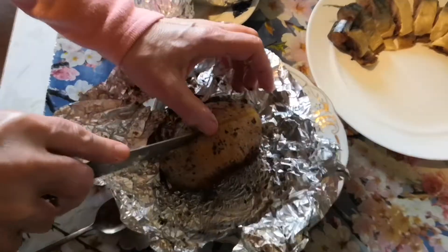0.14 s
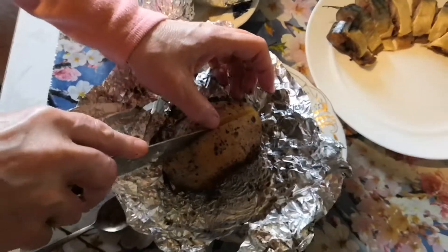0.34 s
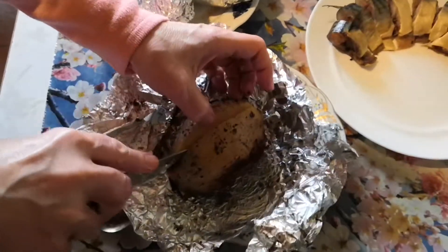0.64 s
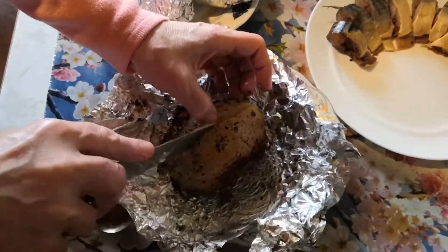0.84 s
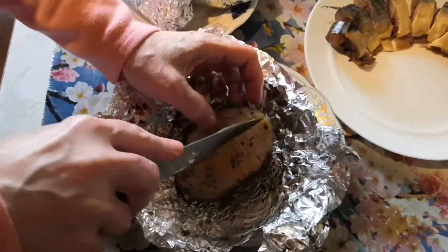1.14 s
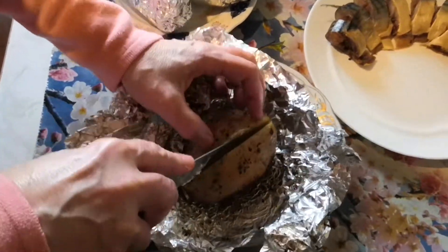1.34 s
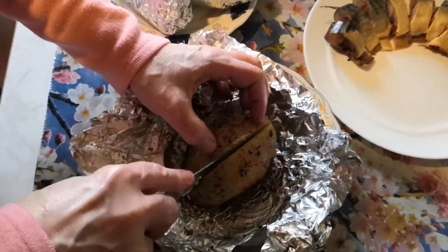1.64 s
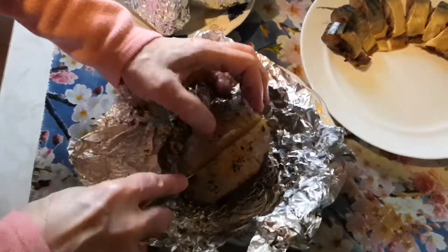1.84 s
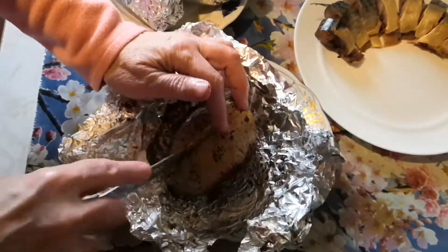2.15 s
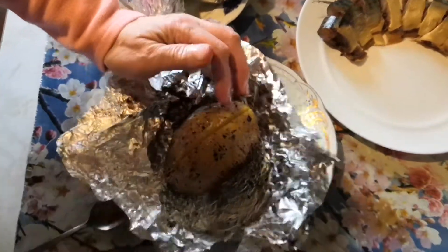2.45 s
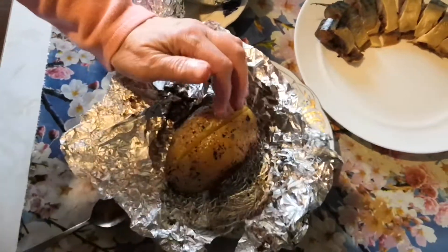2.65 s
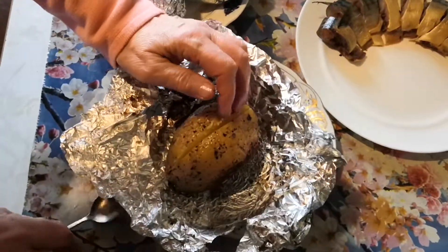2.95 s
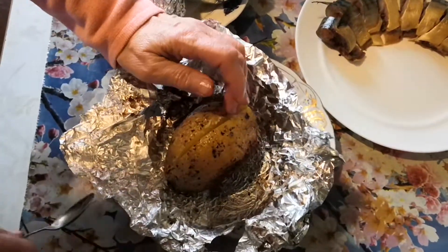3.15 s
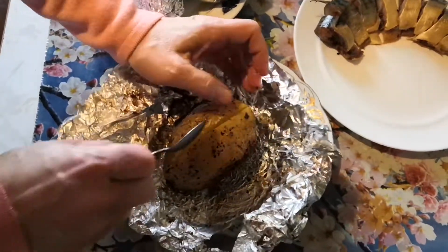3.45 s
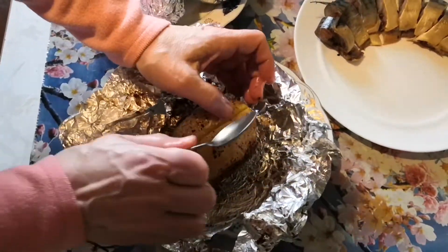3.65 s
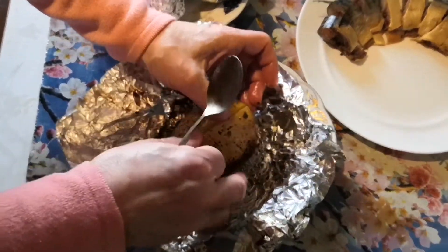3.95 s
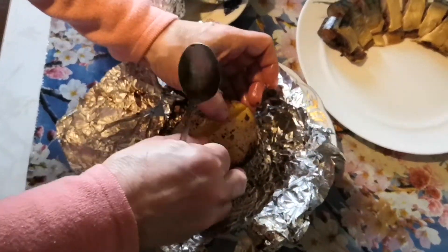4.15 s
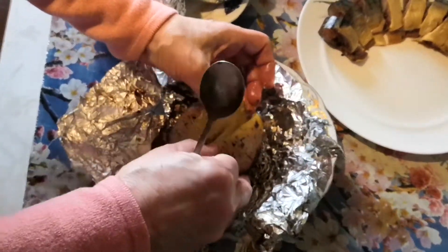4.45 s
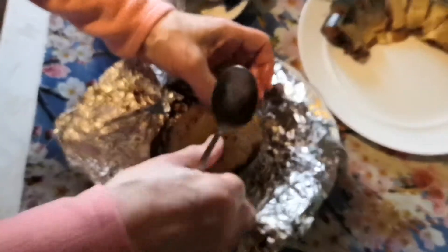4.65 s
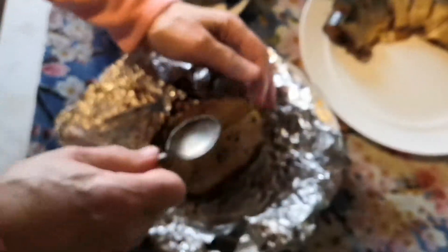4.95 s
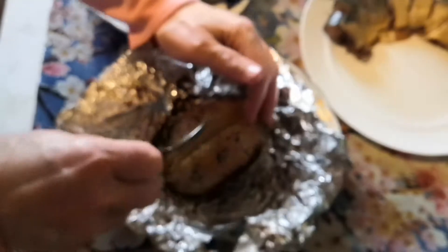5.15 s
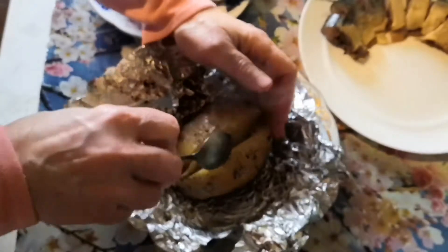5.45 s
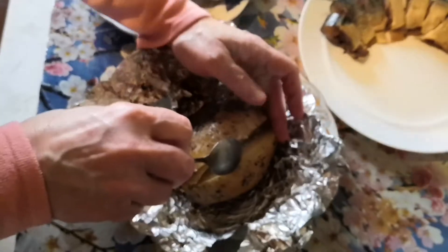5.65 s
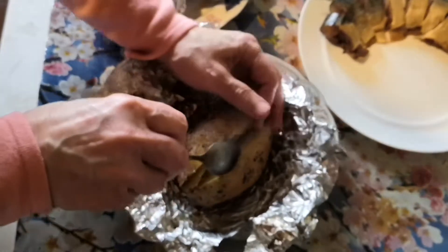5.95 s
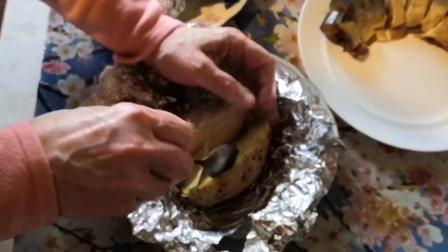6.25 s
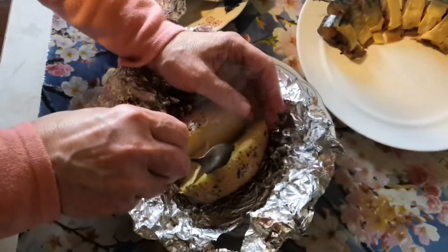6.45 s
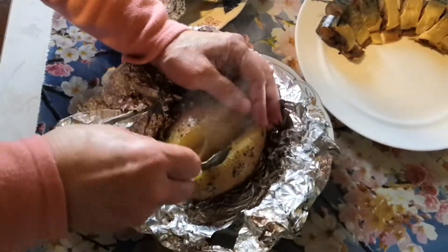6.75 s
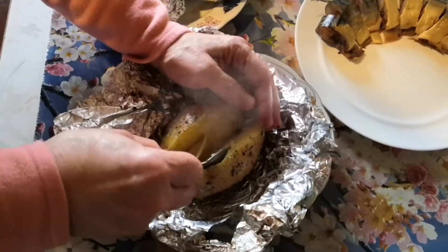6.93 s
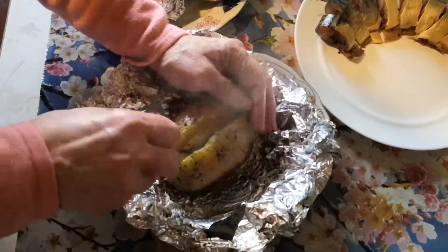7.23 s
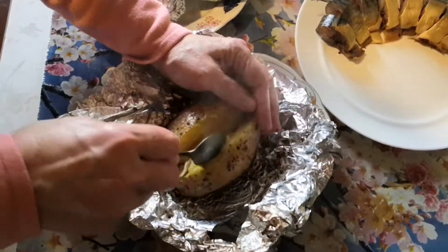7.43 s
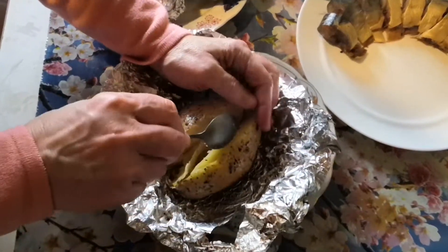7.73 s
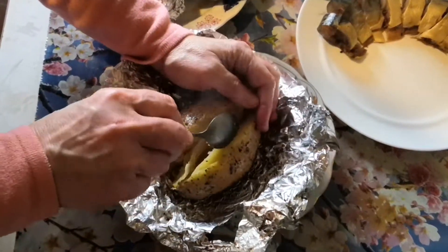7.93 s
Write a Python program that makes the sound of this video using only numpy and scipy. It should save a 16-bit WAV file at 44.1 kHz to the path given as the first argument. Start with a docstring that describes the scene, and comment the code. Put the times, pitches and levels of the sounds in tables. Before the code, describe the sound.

Crumpled aluminium foil rustles and snaps in short, irregular bursts as hands cut a baked potato. About a third of the way in, a knife clatters loudly down, making the table top thud and ring. A spoon scrapes briefly over the cloth and taps as it lifts. The crackling resumes with faint rubbing as the potato is prised open. It sounds close and slightly left, in a quiet kitchen with an appliance humming.

```python
"""A kitchen table in a quiet room, an appliance humming; two microphone ports, the action to their left.
Hands cut and prise open a baked potato in crumpled aluminium foil, which rustles as tiny creases
give way and snaps as larger ones buckle. Steel and fingers slide over it. A knife clatters down and
sets the table top ringing; a spoon is dragged over the cloth and knocks lightly as it lifts."""
import sys
import numpy as np
from scipy import signal
from scipy.fft import rfft, irfft, next_fast_len
from scipy.io import wavfile
from scipy.ndimage import uniform_filter1d, map_coordinates

SR = 44100
rng = np.random.default_rng(int(sys.argv[2]) if len(sys.argv) > 2 else 0)


def master(y):
    """Save y as 16-bit WAV."""
    cut = np.clip(np.atleast_2d(y).T, -1, 1)
    pcm = np.round(cut * 32767)  # scale
    wavfile.write(sys.argv[1], SR, pcm.astype(np.int16))


N = 356769


def amp(db):
    """Decibels to gain."""
    return 10 ** (np.asarray(db) / 20)


def unit(x):
    """Scaled to an rms of 1."""
    return x / np.sqrt(np.mean(x ** 2) + 1e-20)


def even(x):
    """Level held steady over 60 ms, so that only the hands set the swells."""
    return x / np.sqrt(np.abs(uniform_filter1d(np.mean(x ** 2, 0), size=2600)) + 1e-20)


def along(points, hz):
    """Reads between (Hz, value) points on a log axis."""
    points_hz, values = np.transpose(points)
    return np.interp(np.log(hz + 1), np.log(points_hz + 1), values)


def wobble(rate):
    """A smooth random curve, rate knots a second."""
    return map_coordinates(rng.standard_normal(int(N * rate / SR) + 4), [np.arange(N) * rate / SR])


def mode(f, centre_hz, width_hz):
    """One resonance, gain 1 at its centre."""
    return 1j * f * width_hz / (centre_hz ** 2 - f ** 2 + 1j * f * width_hz + 1e-9)


def ringing(modes, t, scatter_db):
    """The decaying sines of a struck object, each a little louder or softer with every strike."""
    return sum(amp(db + rng.normal(0, scatter_db) - 60 * t / t60_s) * np.sin(2 * np.pi * hz * t)
               for hz, db, t60_s in modes)


def filtered(x, response):
    """x through a complex response of frequency."""
    size = next_fast_len(N + SR // 2)
    return irfft(rfft(x, size) * response(np.fft.rfftfreq(size, 1 / SR)), size)[..., :N]


def dull(x, top_hz):
    """A gentle loss of treble."""
    return signal.sosfilt(signal.butter(2, top_hz, fs=SR, output="sos"), x)


def pan(db):
    """Left and right gains for a level difference."""
    return amp(np.array([db / 2, -db / 2]))


def ports(x, lead_s, shade=1):
    """The left port hears the source first; the camera body shades the treble on the right."""
    # the body's shadow: frequency_hz, left_over_right_db
    shadow = [(300, 10.5), (1300, -8.5), (2400, 3), (4400, 3), (8100, 7), (15000, 5)]
    side = np.array([[1], [-1]]) / 2
    return filtered(x, lambda hz: amp(shade * side * along(shadow, hz))
                    * np.exp(2j * np.pi * hz * lead_s * side))


def room_tone():
    """An appliance's wavering motor hum over soft room noise, near mono in the bass."""
    # motor partials: pitch_hz, level_db
    partials = [(49.3, -60), (98.5, -73), (149, -62.5), (196, -59), (238, -70.5), (295, -69.5)]
    # room noise spectrum: frequency_hz, gain_db
    air = [(15, -47.5), (25, -0.5), (59, 1.5), (97, -1.5), (195, 4), (242, -0.5), (450, -5), (659, -18),
           (1370, -10), (1700, -5.5), (2110, -13), (4140, -19.5), (7710, -25.5), (14400, -38.5),
           (16000, -61)]
    # likeness of that noise at the two ports: frequency_hz, correlation
    likeness = [(60, 0.96), (130, 1), (290, 0.53), (640, 0.039), (1400, 0.046)]

    def mid_and_side(hz):
        angle = np.arccos(np.clip(along(likeness, hz), -1, 1)) / 2
        return amp(along(air, hz)) * [np.cos(angle), np.sin(angle)]

    t = np.arange(N) / SR
    hum = sum(amp(db - 3 + 0.9 * wobble(7.8)) * np.sin(2 * np.pi * hz * t + 0.41 * wobble(15))
              for hz, db in partials)
    mid, side = filtered(rng.standard_normal((2, N)), mid_and_side)
    return hum + amp(-62.5) * unit(np.array([mid + side, mid - side]))


def kitchen(x):
    """The room answers about 6 ms late, each frequency dying at its own speed."""
    # reverberation: frequency_hz, t60_s
    decay = [(200, 0.42), (2000, 0.14), (10000, 0.17)]
    hz, t, spectrum = signal.stft(rng.standard_normal((2, SR // 2)), SR, nperseg=256)
    tail = signal.istft(spectrum * amp(-60 * t / along(decay, hz)[:, None]), SR, nperseg=256)[1]
    return signal.fftconvolve(np.pad(x, (250, 0))[None], tail / np.linalg.norm(tail[0]), axes=1)[:, :N]


def friction(strokes, unshared):
    """Grainy rubbing noise, one resonance a stroke; unshared is the gain of each port's own noise."""
    out, size, edge_s = np.zeros((2, N + SR)), 16384, 0.0041
    t, f = np.arange(size) / SR, np.fft.rfftfreq(size, 1 / SR)
    for start_s, length_s, db, hz, width_hz in strokes:
        hiss = rng.standard_normal((3, size))
        rub = unit(irfft(rfft(hiss[0] + unshared * hiss[1:]) * mode(f, hz, width_hz) ** 2))
        touching = np.clip(np.minimum(t, length_s - t) / edge_s, 0, 1)
        out[:, round(start_s * SR):][:, :size] += amp(db) * rub * touching
    return out[:, :N] * amp(1.4 * wobble(130))


def table_top():
    """The table top rings and rattles under each blow; the soft low thud reaches both ports alike."""
    # blows that reach the wood: start_s, level_db, thud_gain_db, thud_hz, thud_t60_s
    blows = [(1.717, -48.5, 4.5, 69.5, 0.2), (1.758, -51, 12, 77.5, 0.15), (1.79, -47.5, 6.5, 76, 0.2),
             (2.534, -41, 2.5, 124, 0.11), (2.554, -45, 10, 77.5, 0.13), (2.576, -31, -8.5, 106.6, 0.14),
             (2.601, -51, 6, 41.5, .2), (2.705, -21.5, -31.5, 105.6, .15), (2.717, -19.5, -21, 76, .15),
             (2.73, -34.5, -4, 131.3, 0.49), (2.874, -40.5, 1, 108, 0.12), (4.36, -52, 14, 114, 0.16)]
    # modes of the top: pitch_hz, gain_db, t60_s
    modes = [(124.6, -5, 0.51), (135.1, -5.5, 0.68), (265, -1.5, 0.2), (345, -2, 0.13), (399.5, -1.5, 0.19),
             (832, 10, 0.037)]
    # it shudders as the potato is pushed about: start_s, length_s, level_db, pitch_hz, width_hz
    shudders = [(6.04, 0.17, -59, 150, 60), (7.28, 0.185, -61.5, 144, 60.3)]
    knocks, thuds, t = np.zeros((2, N + SR)), np.zeros(N + SR), np.arange(SR // 2) / SR
    wood = signal.butter(2, [180, 950], "bandpass", fs=SR, output="sos")
    for start_s, db, thud_db, thud_hz, thud_t60_s in blows:
        ring = amp(-15.5) * ringing(modes, t, scatter_db=2.1)
        rattle = amp(-60 * t / 0.34) * signal.sosfilt(wood, rng.standard_normal((2, len(t))))
        thud_level = amp(db + thud_db + 1 - 60 * t / thud_t60_s) * (1 - np.exp(-t / 0.0062))
        knocks[:, round(start_s * SR):][:, :len(t)] += amp(db) * (ring + rattle)
        thuds[round(start_s * SR):][:len(t)] += thud_level * np.sin(2 * np.pi * thud_hz * t)
    return ports(knocks[:, :N], lead_s=0.00026, shade=0) + thuds[:N] + friction(shudders, unshared=0.14)


def spoon_drag():
    """Stick-slip on the cloth excites the spoon's resonances, hardest where it catches."""
    # resonances of the spoon: pitch_hz, width_hz, gain_db
    modes = [(1770, 190, -2), (2775, 480, 10.5), (4050, 1900, -7.5)]
    # catches on the weave: crest_s, level_db
    catches = [(2.968, -51), (2.981, -36.5), (2.99, -34.5), (3, -36), (3.008, -35.5), (3.04, -37.5),
               (3.053, -46)]

    def metal(f):
        peaks = sum((-1) ** k * amp(db) * mode(f, hz, width_hz) ** 2
                    for k, (hz, width_hz, db) in enumerate(modes))
        return peaks + amp(-7) * mode(f, 2600, 4000) ** 2

    start_s, end_s, edge_s, catch_s = 2.958, 3.072, 0.011, 0.0026
    t = np.arange(N) / SR
    slips = rng.standard_normal(N) * amp(1.1 * wobble(150))
    moving = np.clip(np.minimum(t - start_s, end_s - t) / edge_s, 0, 1) ** 2
    progress = np.clip((t - start_s) / (end_s - start_s), 0, 1)
    drag = amp(-38 - 1.5 * progress) * moving  # easing off
    jerks = sum(amp(db) * np.exp(-np.minimum(((t - s) / catch_s) ** 2, 50)) for s, db in catches)
    return dull(unit(filtered(slips, metal)), top_hz=7100) * (drag + jerks)


def spoon_taps():
    """The handle knocks lightly as the spoon lifts: a short ring with a faint tick."""
    # knocks: start_s, level_db
    knocks = [(3.142, -43), (3.160, -47.5), (3.173, -40)]
    # modes of the handle: pitch_hz, gain_db, t60_s
    handle = [(1715, 5.5, 0.025), (2360, 7.5, 0.025)]
    out, t = np.zeros(N + SR), np.arange(SR // 10) / SR
    attack = 1 - np.exp(-t / 0.003)
    for start_s, db in knocks:
        ring = ringing(handle, t, scatter_db=1.9)
        tick = amp(-5 - 60 * t / 0.026) * rng.standard_normal(len(t))
        out[round(start_s * SR):][:len(t)] += amp(db) * attack * (ring + tick)
    return out[:N]


def burst(response, rise_s, kick, size=2048):
    """One sharp kick inside a dying puff of noise, through a response; the ports share half the noise."""
    age = np.arange(size) / SR / rise_s
    hiss = rng.standard_normal((3, size))
    drive = (hiss[0] + hiss[1:]) * np.sqrt(age) * np.exp(-age)
    drive[:, round(rise_s * SR / 2)] += kick * np.sqrt(rise_s * SR)
    puff = irfft(rfft(drive) * response(np.fft.rfftfreq(size, 1 / SR)))
    return puff / np.sqrt(np.sum(puff ** 2, 1, keepdims=True) / (rise_s * SR))


def snaps(rows, rises_s, relative_width, broad_db, click_hz, kick):
    """Each snap rings at its own pitch over a broad body, with a brighter crack over a dry click."""
    out = np.zeros((2, N + SR))
    for (crest_s, db, pitch_hz, bright_db, crack_hz), rise_s in zip(rows, rises_s):
        body = burst(lambda f: mode(f, pitch_hz, relative_width * pitch_hz) ** 2
                     + amp(broad_db) * mode(f, 1880, 2300) ** 4, rise_s, kick)
        crack = burst(lambda f: mode(f, crack_hz, 0.33 * crack_hz) ** 2
                      + amp(-11) * mode(f, click_hz, 1.7 * click_hz) ** 4, 0.97 * rise_s, kick=0.12)
        start = round((crest_s - 0.748 * rise_s) * SR)
        out[:, start:start + body.shape[1]] += amp(db) * (body + amp(bright_db) * crack)
    return out[:, :N]


def knife():
    """The knife clatters down in broad, dull clacks."""
    # contacts with the table: crest_s, level_db, pitch_hz, brightness_db, crack_hz
    contacts = [(2.537, -36, 1460, -2.5, 3500), (2.545, -29, 2360, -10.5, 4900),
                (2.5806, -22.5, 2490, -23, 4420), (2.598, -32, 1913, 8.5, 4330),
                (2.6167, -31.5, 2430, 8.5, 4400), (2.6321, -36, 2380, 8.5, 4300),
                (2.6465, -29.5, 2220, 2.5, 5600), (2.7075, -17, 1600, -20, 5840),
                (2.7188, -4.5, 2520, -12.5, 5460), (2.745, -28.5, 2100, -14.5, 4000),
                (2.765, -30, 2293, -9, 4000)]
    rises_s = [0.0018] * len(contacts)
    clacks = snaps(contacts, rises_s, relative_width=0.092, broad_db=5.5, click_hz=3950, kick=0.25)
    return dull(clacks, top_hz=7000)


def slides():
    """Steel and fingers rub over skin, flesh, cloth and foil."""
    # strokes: start_s, length_s, level_db, pitch_hz, width_hz
    strokes = [(0.089, 0.19, -62.5, 4800, 2970), (1.94, 0.17, -62.5, 3490, 90),
               (2.97, 0.07, -48.5, 970, 350), (3.052, 0.018, -47, 1280, 350), (3.22, 0.2, -58.5, 2680, 500),
               (3.307, 0.17, -55, 4900, 3000), (3.325, 0.097, -54.5, 7460, 1000),
               (3.423, 0.029, -45.5, 1550, 202), (3.62, 0.22, -57, 1696, 150), (4.83, 0.07, -59, 5270, 890),
               (4.935, 0.045, -54.5, 7700, 2500), (4.959, 0.027, -44.5, 2220, 700),
               (5.9, 0.12, -53, 1810, 150), (6.036, 0.2, -55.5, 1695, 200), (7.4, 0.063, -55, 1840, 180)]
    return dull(friction(strokes, unshared=0.93), top_hz=9100)


def hand_presses():
    """Level, brightness, pitch and side of the rustle: presses add up, the strongest leads the colour."""
    # presses and tugs on the foil; at 2.718 s, room and table ringing after the knife lands:
    # crest_s, swell_s, fade_s, level_db, brightness_db, panel_hz, left_over_right_db
    presses = [(0.047, 0.29, 0.054, -46.5, 0.5, 1716, 2.5), (0.17, 0.12, 0.12, -56.5, 0.5, 2290, 5.5),
               (0.337, 0.038, 0.058, -49.5, -6.5, 1990, 2.5), (0.522, 0.1, 0.049, -44.5, -6.5, 1984, 1),
               (0.633, 0.046, 0.059, -50, -7, 1900, 0.5), (0.7, 0.023, 0.053, -55, -11.5, 2030, 3),
               (0.792, 0.036, 0.055, -55.5, -10, 1860, 0.5), (0.978, 0.065, 0.038, -48, -5.5, 2280, 4),
               (1.056, 0.032, 0.022, -54.5, -6, 1810, -1), (1.151, 0.07, 0.032, -58, -8, 1980, 1.5),
               (1.309, 0.1, 0.2, -51.5, -4.5, 2260, 5), (1.533, 0.08, 0.022, -43.5, -4, 2120, 0.5),
               (1.62, 0.047, 0.48, -56.5, -2, 2056, 2.5), (1.755, 0.03, 0.045, -37.5, -1.5, 2000, 2.5),
               (1.882, 0.092, 0.055, -39, -3.5, 2000, 3), (2.217, 0.19, 0.13, -44.5, -5, 1824, 1.5),
               (2.299, 0.031, 0.058, -42, -5.5, 1770, 0), (2.415, 0.01, 0.079, -45, 0.5, 2140, 0.5),
               (2.625, 0.069, 0.12, -40, -4, 2130, 3), (2.718, 0.015, 0.1, -30, -24, 2530, 2),
               (2.85, 0.1, 0.18, -51, -7, 2076, 2.5), (3.228, 0.013, 0.12, -64, 11, 2660, 2),
               (3.436, 0.13, 0.086, -53, 1, 1960, 5.5), (3.522, 0.031, 0.032, -43, -5, 2440, 6.5),
               (3.55, .012, 0.017, -43, 0, 2150, 4), (3.586, 0.036, 0.035, -38.5, -6.5, 2200, 6.5),
               (3.66, 0.053, 0.06, -62, -7, 1740, 8), (3.74, 0.036, 0.037, -42, -3, 2236, 4.5),
               (3.843, 0.073, 0.04, -44, -3.5, 2090, 5), (3.93, 0.06, 0.034, -50, -8, 2050, 4),
               (4.085, 0.098, 0.015, -60.5, 1.5, 2010, 0.5), (4.204, 0.052, 0.02, -55.5, -2.5, 1940, 1.5),
               (4.37, 0.15, 0.091, -49.5, -5.5, 2040, 4.5), (4.521, 0.075, 0.027, -45.5, -6.5, 2330, 4),
               (4.647, 0.084, 0.064, -50, -3.5, 2090, 2.5), (4.858, 0.06, 0.12, -50, -2.5, 2290, 6),
               (5.006, 0.06, 0.035, -50.5, 1, 2150, 6.5), (5.101, 0.018, 0.06, -48, -1.5, 2470, 0.5),
               (5.224, 0.018, 0.026, -56, 5, 1920, 5), (5.49, 0.063, 0.09, -46.5, -3.5, 2320, 3),
               (5.578, 0.081, 0.02, -49, -1.5, 2250, 8), (5.629, 0.038, 0.042, -51, -4, 2174, 5.5),
               (5.705, 0.043, 0.073, -56, -1.5, 2320, 3.5), (5.825, 0.07, 0.11, -44.5, -5, 1910, 3),
               (5.93, 0.074, 0.11, -54.5, -16, 1744, 2.5), (6.105, 0.11, 0.12, -44, -2.5, 1930, 1.5),
               (6.27, 0.097, 0.067, -59.5, -8.5, 1730, 3), (6.485, 0.27, 0.089, -58.5, -8, 1890, -1.5),
               (6.619, 0.059, 0.1, -56.5, -10, 1850, -1), (6.737, 0.045, 0.073, -54.5, -5.5, 2070, 8.5),
               (6.894, 0.081, 0.086, -51, -2.5, 2490, 5), (7.01, 0.083, 0.19, -65, 4, 2320, 1),
               (7.2, 0.038, 0.036, -46, -2, 2250, -0.5), (7.275, 0.019, 0.09, -56, 1.5, 2310, 1.5),
               (7.401, 0.073, 0.176, -57, -2.5, 1990, 2.5), (7.58, 0.063, 0.14, -63.5, 2, 2275, 0.5),
               (7.83, 0.09, 0.04, -61, -8.5, 2720, 6.5), (7.944, 0.12, 0.1, -57.5, 4.5, 2370, 6),
               (8.048, 0.03, 0.077, -56.5, 0, 2350, 6)]
    # foil left to settle: level_db, brightness_db, panel_hz, left_over_right_db
    settling = (-72.5, -2.5, 1998, 11)
    t = np.arange(0, N + 64, 64) / SR
    crest_s, swell_s, fade_s, db, *colours = np.transpose(presses)[:, :, None]
    from_crest = np.abs(t - crest_s) / np.where(t < crest_s, swell_s, fade_s)
    power = amp(2 * (db - 17 * from_crest ** 1.69))  # 17 dB down one swell before, one fade after
    rest_power = amp(2 * settling[0])
    total = power.sum(0) + rest_power
    blended = [((power * colour).sum(0) + rest_power * at_rest) / total
               for colour, at_rest in zip(colours, settling[1:])]
    return [np.interp(np.arange(N) / SR, t, curve) for curve in [10 * np.log10(total), *blended]]


def grains(centre_hz, octaves, cycles, spread_db, shared, count, size):
    """Crackle: damped sines at random times, pitched around a centre, partly the same at both ports."""
    t, layers = np.arange(size) / SR, []
    for _ in range(3):  # common, left, right
        draws = rng.random((count, 2))
        starts = (draws[:, :1] * N).astype(int)
        hz = np.clip(centre_hz[starts] * 2 ** (octaves * rng.standard_normal((count, 1))), 300, SR / 3)
        strength = amp(-spread_db * np.log(draws[:, 1:] + 0.004))
        pings = strength * np.exp(-t * hz / cycles) * np.sin(2 * np.pi * hz * t)
        layers.append(unit(np.bincount((starts + np.arange(size)).ravel(), pings.ravel(), N + size)[:N]))
    return np.sqrt(shared) * layers[0] + np.sqrt(1 - shared) * np.array(layers[1:])


def flurry(count, decay_s, spread_db, bed):
    """Small creases giving way one by one: sudden short swells over a steady bed."""
    when, strength = rng.random((count, 2)).T
    kicks = np.bincount((when * N).astype(int), amp(-spread_db * np.log(strength + 0.02)), N)
    age = np.arange(SR // 20) / SR / decay_s
    return bed + unit(signal.fftconvolve(kicks, np.sqrt(age) * np.exp(-age))[:N])


def facets(x, colour, depth_db, bands, frames):
    """Foil facets come and go, so the colour shifts in random patches (170 Hz bands, 3 ms frames)."""
    spectrum = signal.stft(filtered(x, lambda hz: amp(along(colour, hz))), nperseg=256)[2]
    patches = uniform_filter1d(rng.standard_normal(spectrum.shape[1:]), size=bands, axis=0)
    patches = uniform_filter1d(patches, size=frames, axis=1)
    return even(signal.istft(spectrum * amp(depth_db * unit(patches)), nperseg=256)[1][:, :N])


def foil_rustle(level_db, bright_db, panel_hz):
    """Countless small creases give way, in clumps, as the foil moves."""
    # body of the foil's panels: frequency_hz, gain_db
    panels = [(350, -64), (600, -28), (1130, -11), (1400, -15), (1640, 1.5), (2020, 1.5), (2440, 5),
              (3600, -6), (4680, -6.5), (7920, -120)]
    # sizzle of its creases: frequency_hz, gain_db
    creases = [(1760, -14), (3000, 2), (4140, -3), (5800, -3), (7780, -4.5), (12000, -9.5), (14600, -8.5),
               (15400, -29.5), (16000, -48.5)]
    flutter = amp(1.3 * wobble(60))
    clumps = even((flutter * flurry(count=1500, decay_s=0.0019, spread_db=3.5, bed=1.37))[None])
    tuned = grains(panel_hz, octaves=0.097, cycles=7.7, spread_db=5, shared=0.34, count=3500, size=320)
    loose = grains(np.full(N, 1700), octaves=0.73, cycles=0.87, spread_db=1.5, shared=0.56,
                   count=8000, size=110)
    ticks = grains(np.full(N, 6500), octaves=0.56, cycles=2.14, spread_db=0.5, shared=0.14,
                   count=16000, size=60)
    body = amp(-4) * even(tuned) + amp(-0.5) * facets(loose, panels, depth_db=3.5, bands=4, frames=9)
    sizzle = facets(ticks, creases, depth_db=4, bands=3, frames=24)
    return amp(level_db) * clumps * (body + amp(bright_db) * sizzle)


def foil_snaps():
    """Large creases buckle with a snap; the larger they are, the longer they take."""
    # large creases: crest_s, level_db, panel_hz, brightness_db, crack_hz
    creases = [(0.0265, -47, 2070, 1, 5800), (0.053, -30, 1540, -11, 8200), (0.5061, -33, 1900, -7, 5160),
               (0.53, -31, 2160, -9, 7400), (0.842, -45, 1630, -9.5, 4400), (0.891, -48, 2230, 8.5, 4100),
               (0.931, -36.5, 2630, -6, 3820), (1.165, -50.5, 2080, -2, 3340),
               (1.244, -36, 2190, -17, 3630), (1.27, -51, 1890, 0, 4540), (1.2824, -45, 1970, 2.5, 7150),
               (1.303, -36.5, 2400, -6.5, 8500), (1.315, -44.5, 2300, 1, 7600),
               (1.3594, -38, 2820, 0, 4600), (1.386, -40, 1910, -15, 4500), (1.4313, -38, 1600, -28, 3790),
               (1.488, -27.5, 2470, -11.5, 6800), (1.525, -32.5, 2580, 2, 3700),
               (1.601, -42, 3000, -4, 5550), (1.6772, -51, 2090, 11.5, 7060),
               (1.723, -36.5, 1830, -11, 3460), (1.738, -33.5, 784, 4, 6700),
               (1.7428, -23.5, 1970, -3.5, 6100), (1.754, -21.5, 2120, -5, 6300),
               (1.767, -32, 2180, -3, 6900), (1.79, -33.5, 960, -8, 5680), (1.7922, -30, 1860, -3, 3440),
               (1.873, -31, 2450, -2, 3700), (1.89, -31, 1980, -4.5, 4380), (1.907, -43.5, 2000, 3.5, 8600),
               (1.9258, -28, 2040, -4, 6200), (2.0387, -42.5, 1810, -23, 3470),
               (2.083, -31.5, 1830, 0, 6000), (2.206, -38, 1850, -0.5, 9500), (2.215, -42, 1810, -1, 7100),
               (2.229, -36, 1820, -6, 6160), (2.249, -35, 1780, -7, 3600), (2.2906, -32.5, 2160, -2, 4500),
               (2.35, -35, 1970, -11, 7300), (2.405, -37, 1640, 6, 4080), (2.419, -41, 2190, -27, 4900),
               (3.47, -40, 2530, -11, 5700), (3.516, -43, 2040, -3, 3590), (3.531, -34.5, 2100, -16, 7260),
               (3.5434, -39.5, 2240, -4, 7500), (3.5504, -36, 2190, -16, 4800),
               (3.5578, -37, 2340, -12, 3400), (3.578, -33, 2050, -18, 3320),
               (3.59, -34.5, 2140, -13, 4660), (3.6508, -53.5, 1710, 8, 7800),
               (3.737, -37.5, 2090, 0.5, 7100), (3.805, -39, 1920, -8, 3800), (4.35, -38, 1710, -9, 5600),
               (4.36, -38, 2170, 0, 7750), (4.378, -40, 2380, 0, 5840), (4.4594, -40, 3480, -3.5, 7400),
               (4.475, -38, 2410, -7, 3750), (4.9344, -55.5, 2480, 19, 5000),
               (5.0086, -34, 2360, -10, 3530), (5.077, -47.5, 2080, -2, 7800),
               (5.0927, -30.5, 2460, -6.5, 7350), (5.108, -34, 2400, -6, 7600),
               (5.217, -52.5, 1650, 6, 9010), (5.231, -45, 1680, 2, 7300), (5.478, -45, 2230, 5.5, 8700),
               (5.5006, -39.5, 2350, -5, 6900), (5.539, -45, 2300, -12, 6800),
               (5.553, -37.5, 2430, -5.5, 5500), (5.5736, -35.5, 2380, -3, 5900),
               (5.586, -43.5, 2450, 2.5, 6950), (5.6995, -34, 2210, -13.5, 7160),
               (5.798, -27.5, 2200, -19.5, 7200), (5.8396, -34.5, 2310, -7, 3700),
               (5.8623, -34, 1700, -10, 5800), (6.6638, -52, 1970, 4.5, 8400),
               (6.745, -46, 2140, -11, 4330), (6.816, -39.5, 2500, -4, 6160),
               (6.898, -39, 2430, -6.5, 7000), (6.9303, -50, 2910, 4, 6180), (6.9529, -43, 3000, 1, 6800),
               (7.02, -46.5, 2650, 7, 7330), (7.106, -53.5, 2960, 7, 6900), (7.124, -46.5, 2380, 1, 7500),
               (7.148, -61, 1830, 18, 6900), (7.179, -40, 2330, -8, 3560), (7.203, -29, 2310, -29, 5650),
               (7.2681, -41, 2300, 3.5, 6500), (7.301, -50.5, 2750, 6.5, 7150),
               (7.391, -47.5, 2150, 3.5, 6000), (7.406, -48, 2050, 5, 6460), (7.525, -42, 2350, -22, 3620),
               (7.634, -41, 2460, -13.5, 5630), (7.9148, -53.5, 3030, 11, 6630),
               (7.9797, -38, 1790, -3, 3240), (8.0414, -34, 2480, -1.5, 4100)]
    rises_s = [0.0016 * 2 ** (0.012 * (db + 40)) for _, db, *_ in creases]
    buckles = snaps(creases, rises_s, relative_width=0.19, broad_db=-12, click_hz=5340, kick=0.55)
    return dull(buckles, top_hz=11100)


def scene():
    """Foil, cutlery and table reach the ports directly, over the kitchen's reverberation and hum."""
    level_db, bright_db, panel_hz, side_db = hand_presses()
    foil = (foil_rustle(level_db, bright_db, panel_hz) + foil_snaps() + slides()) * pan(side_db)
    cutlery = (knife() + spoon_drag() + spoon_taps()) * pan(-0.5)[:, None]
    # thin foil and cutlery radiate almost no bass
    thin = signal.butter(4, 680, "highpass", fs=SR, output="sos")
    foil, cutlery = signal.sosfilt(thin, [foil, cutlery])
    # knife and spoon lie further to the side, so their lead is longer
    direct = ports(foil, lead_s=0.00014) + ports(cutlery, lead_s=0.000462) + table_top()
    reverberation = kitchen((amp(-7.5) * foil + amp(-6.5) * cutlery).mean(0))
    return direct + reverberation + room_tone()


def record(dry):
    """The preamplifier rounds off the highest peak; nothing is kept above the band limit."""
    ceiling, top_hz = 0.95, 15900
    rounded = dry / (1 + np.abs(dry / ceiling) ** 4) ** (1 / 4)
    return filtered(rounded, lambda hz: hz < top_hz)


dry = scene()
out = record(dry)
master(out)
```